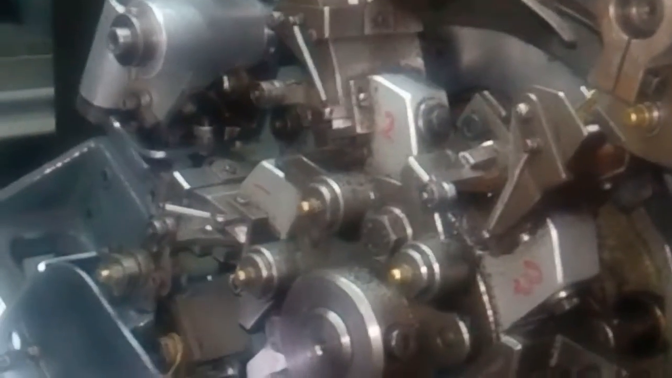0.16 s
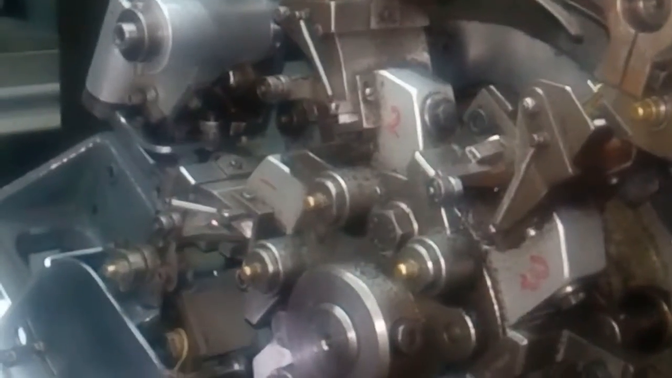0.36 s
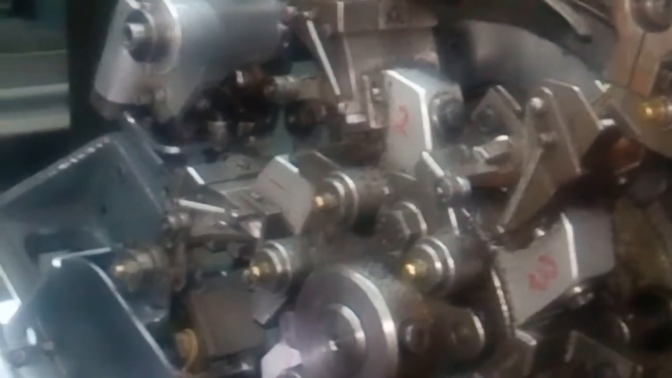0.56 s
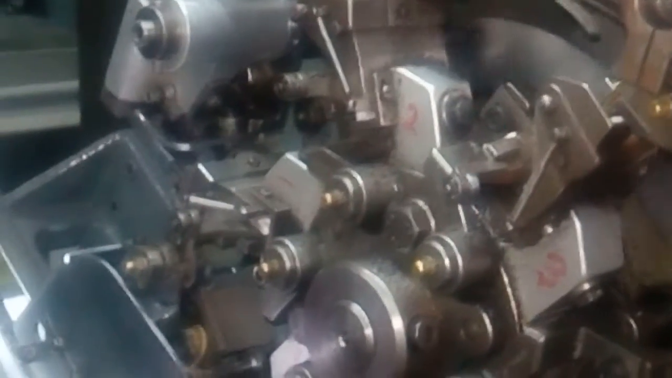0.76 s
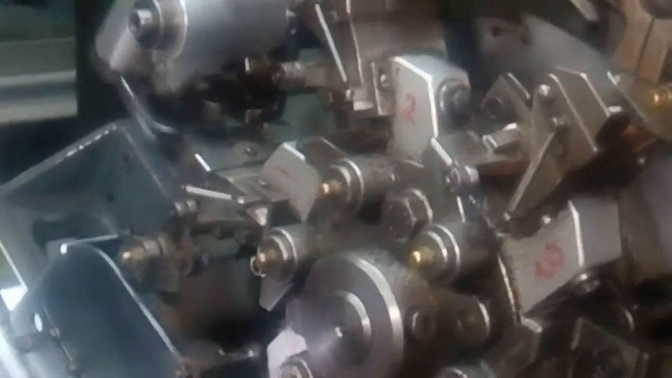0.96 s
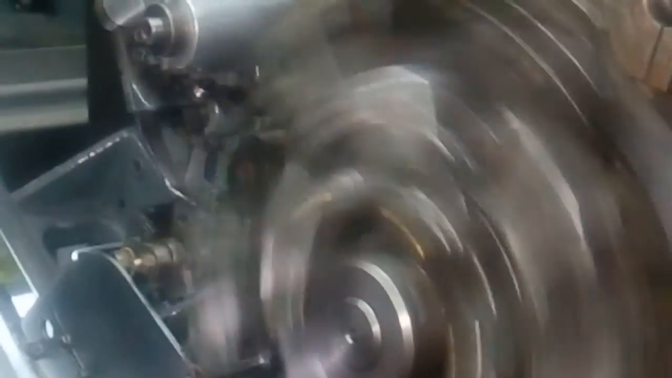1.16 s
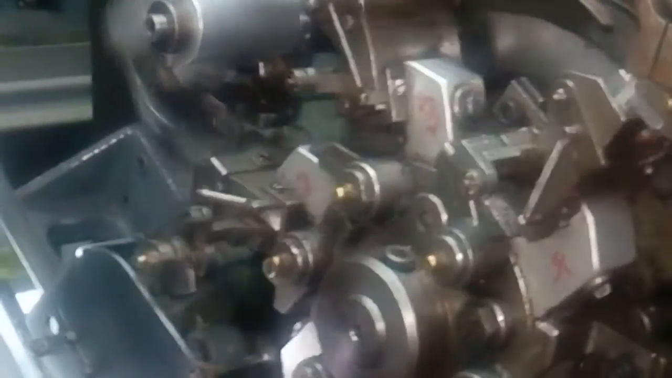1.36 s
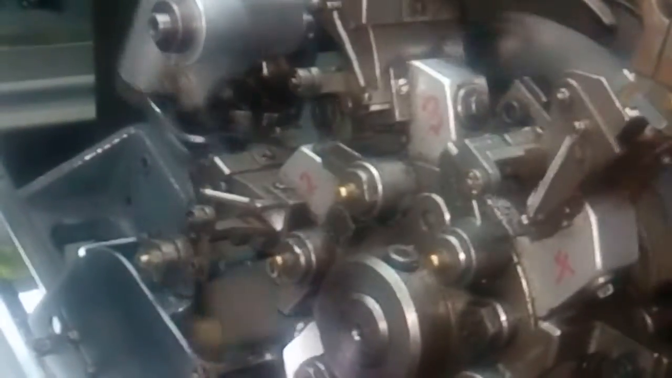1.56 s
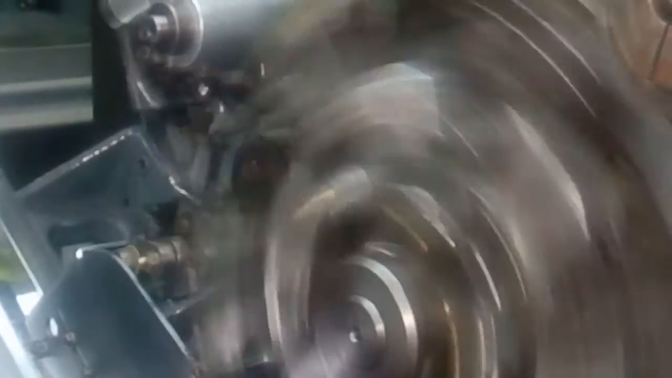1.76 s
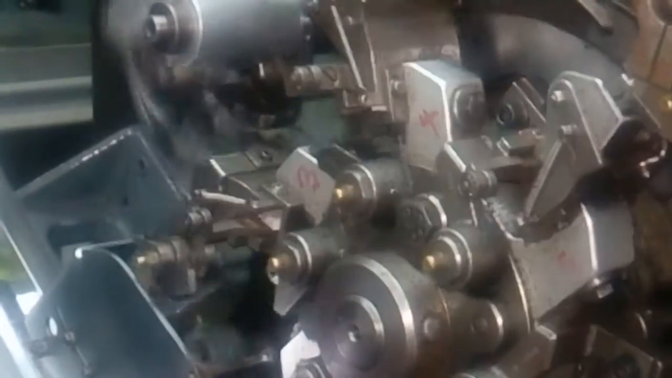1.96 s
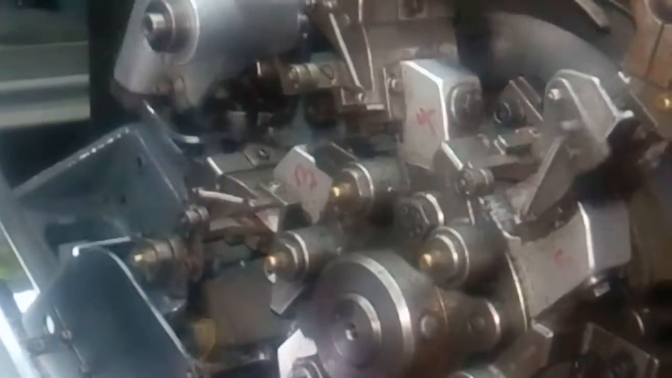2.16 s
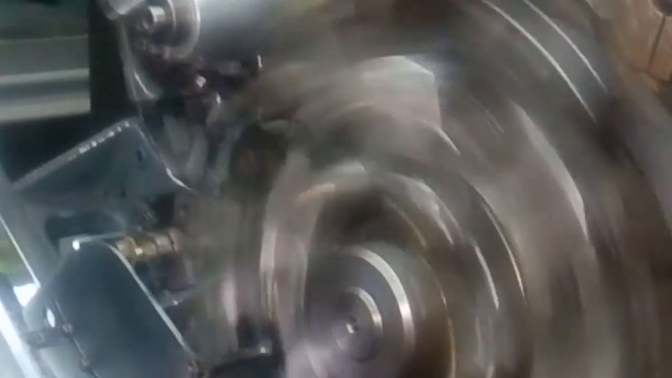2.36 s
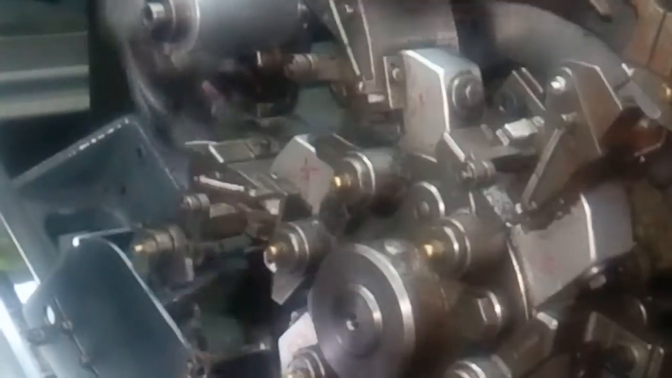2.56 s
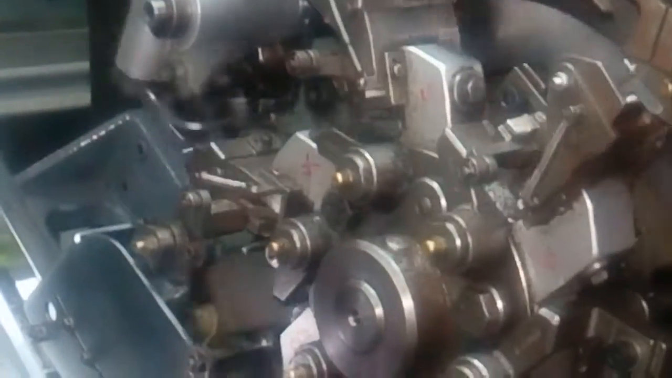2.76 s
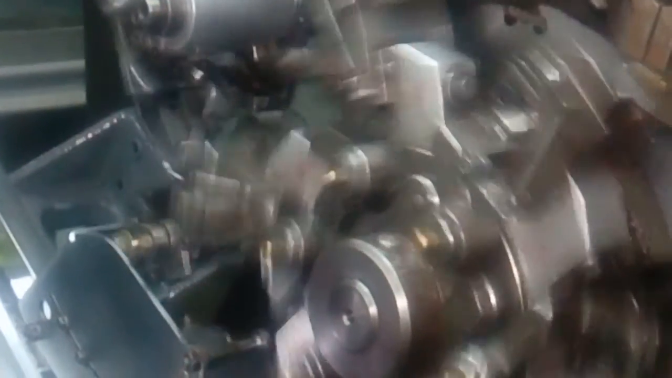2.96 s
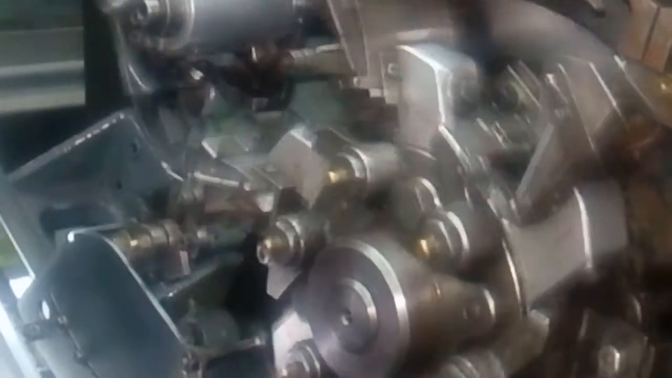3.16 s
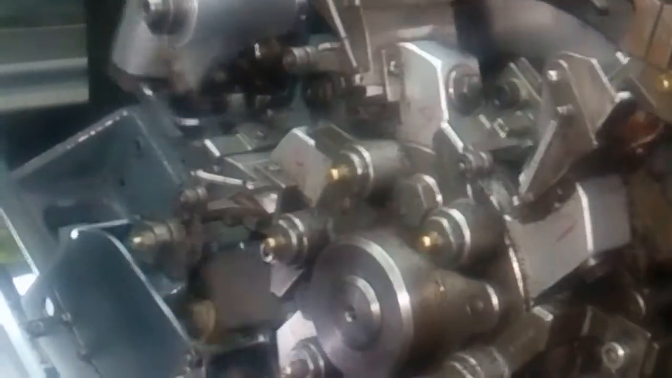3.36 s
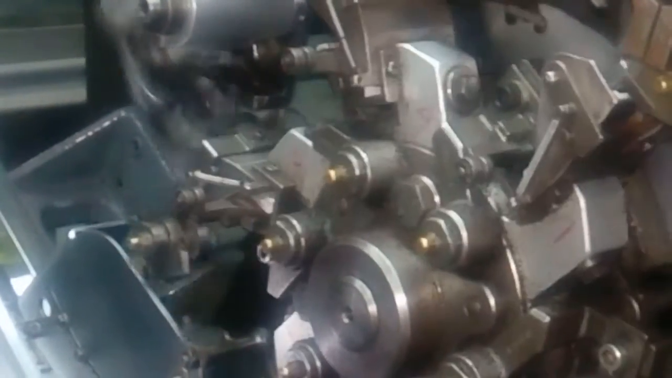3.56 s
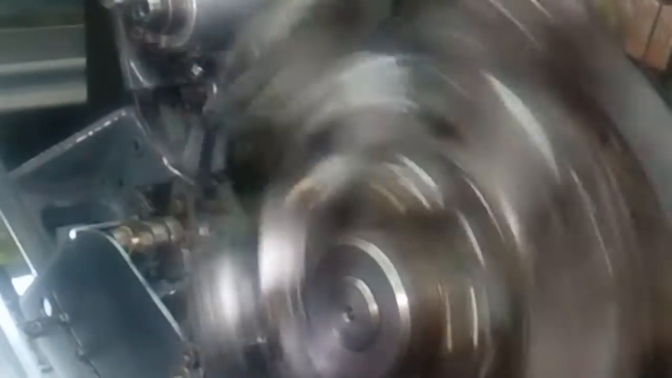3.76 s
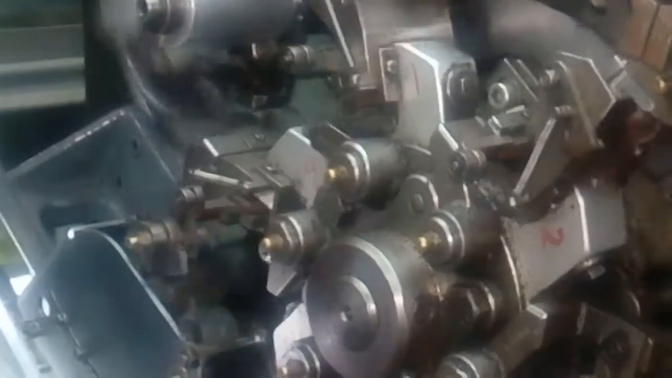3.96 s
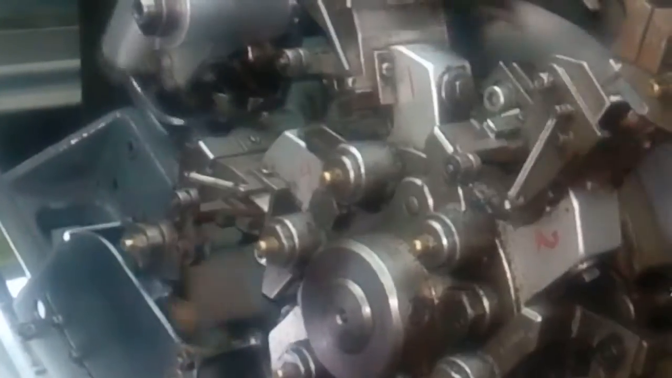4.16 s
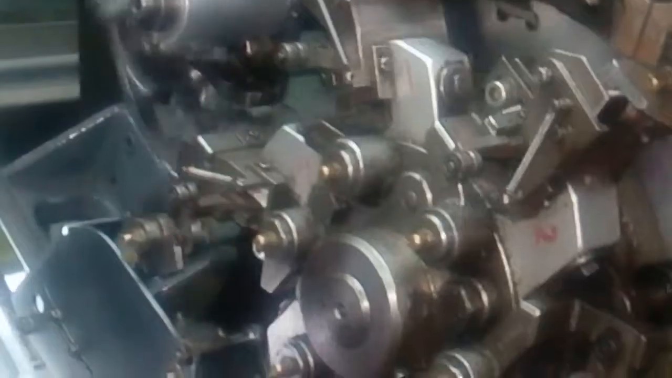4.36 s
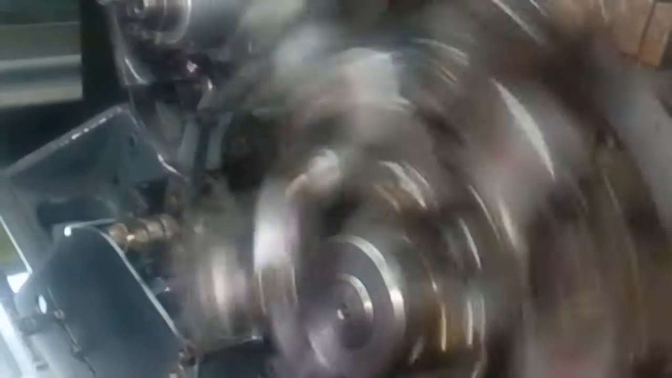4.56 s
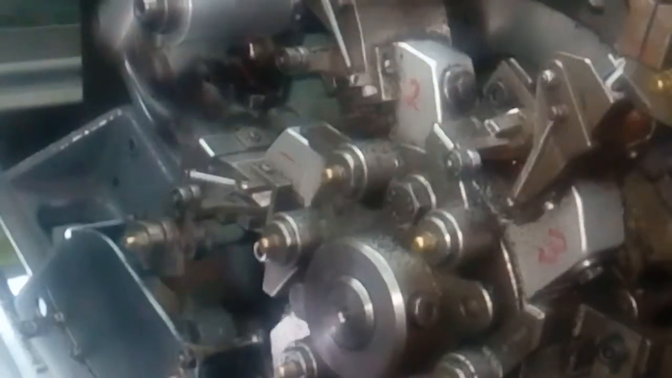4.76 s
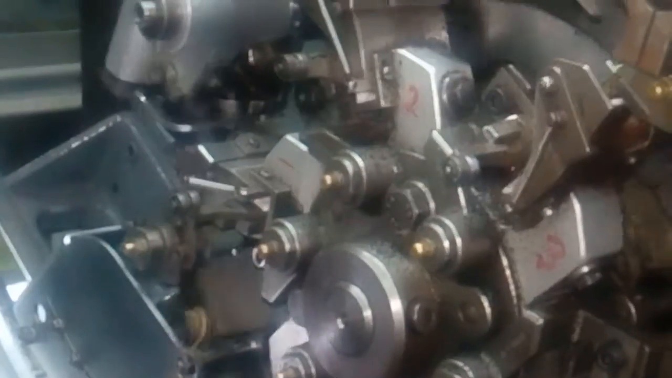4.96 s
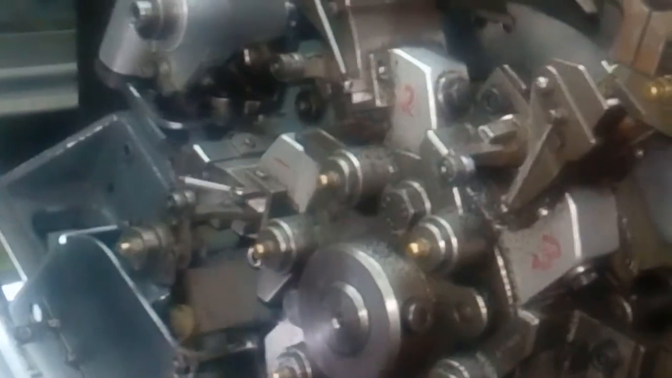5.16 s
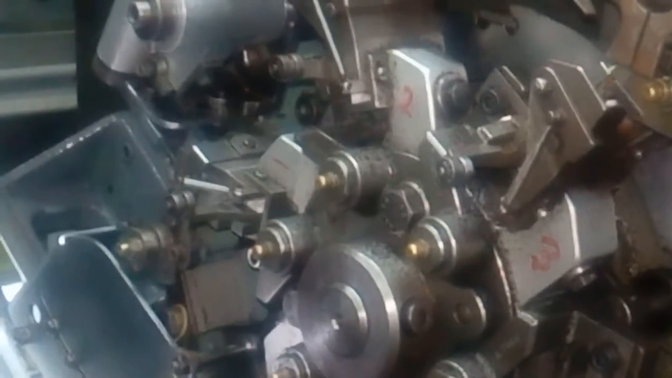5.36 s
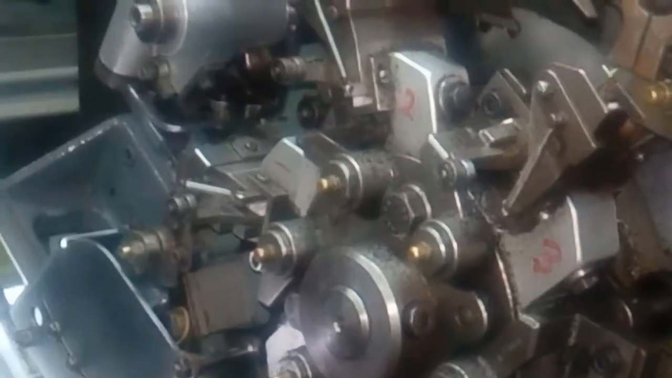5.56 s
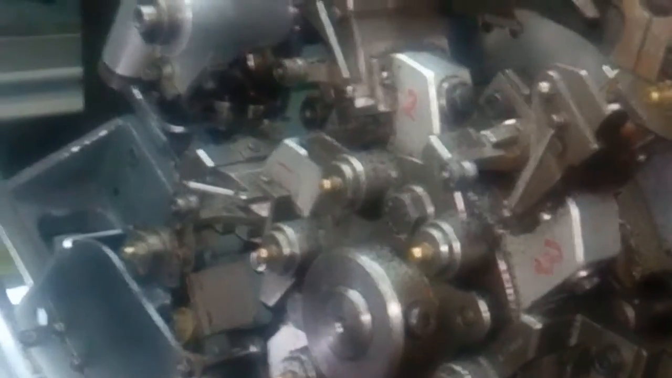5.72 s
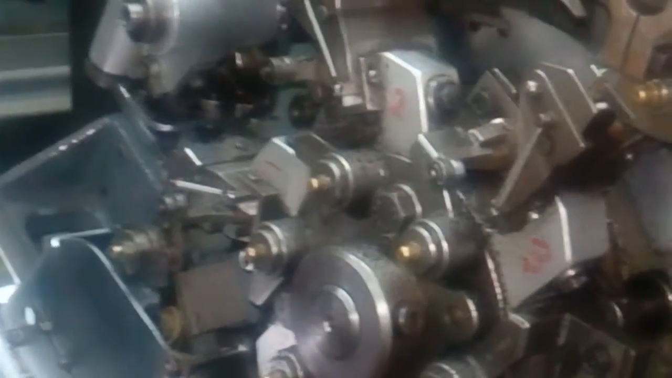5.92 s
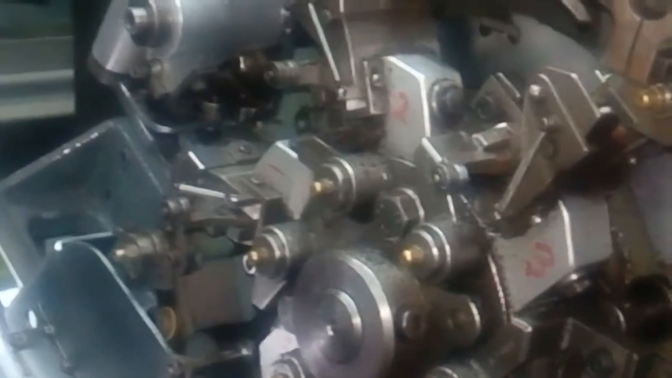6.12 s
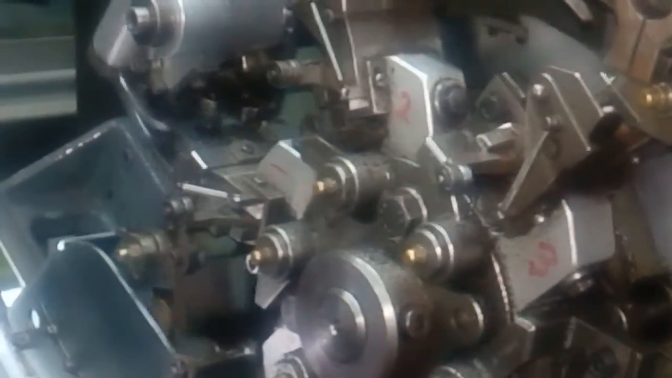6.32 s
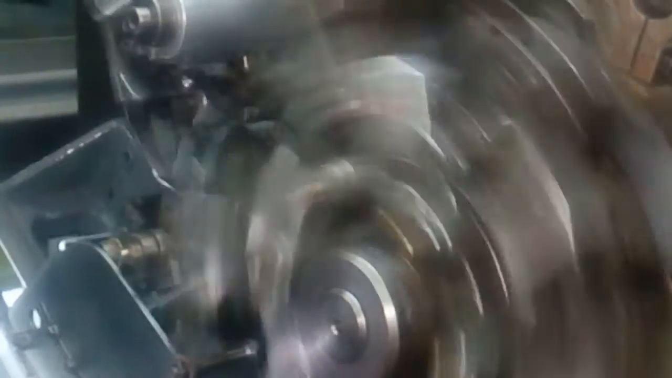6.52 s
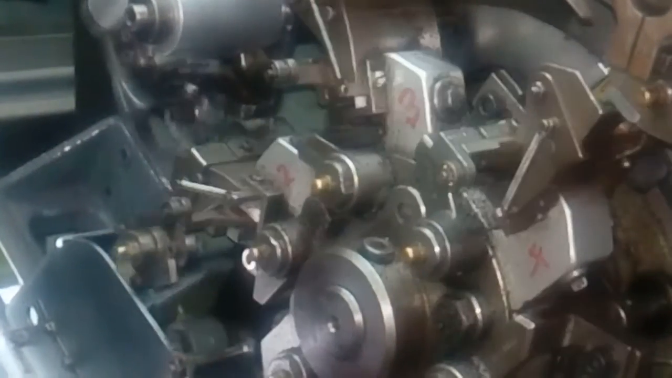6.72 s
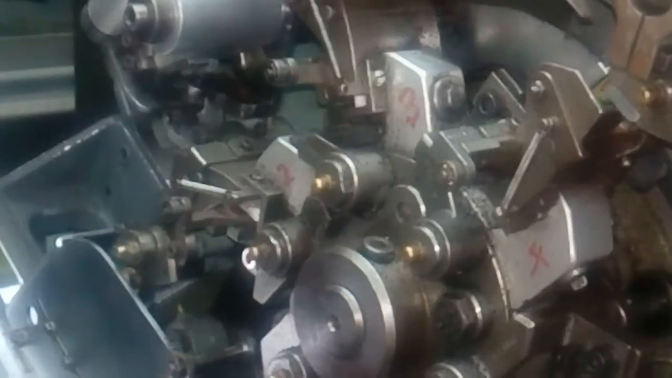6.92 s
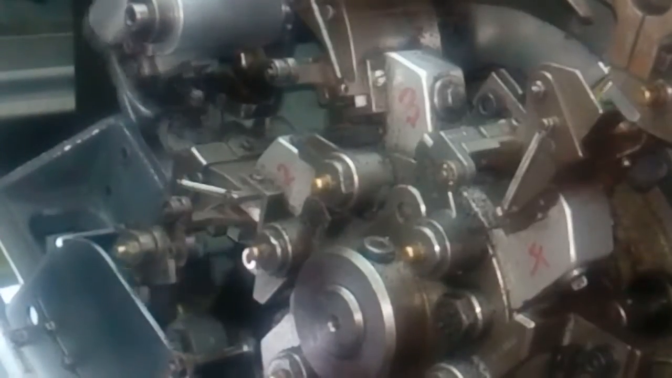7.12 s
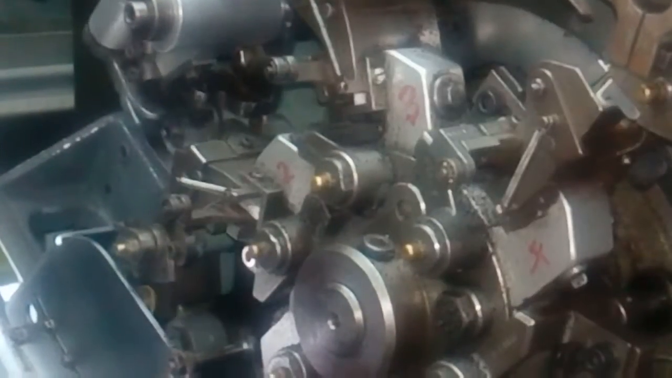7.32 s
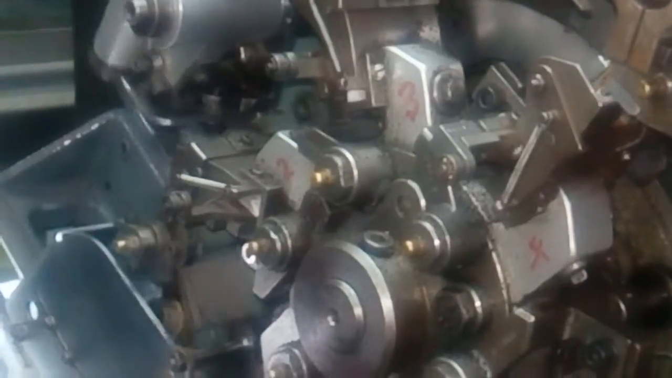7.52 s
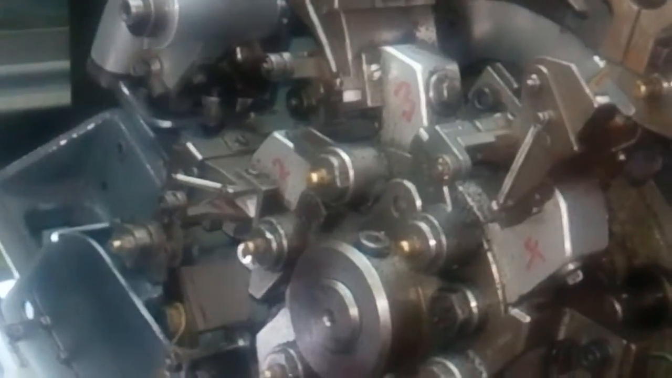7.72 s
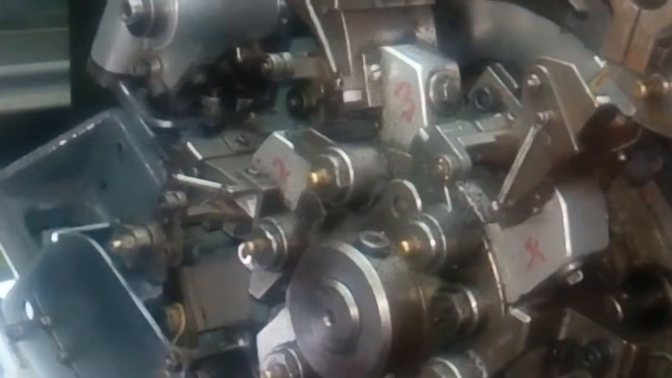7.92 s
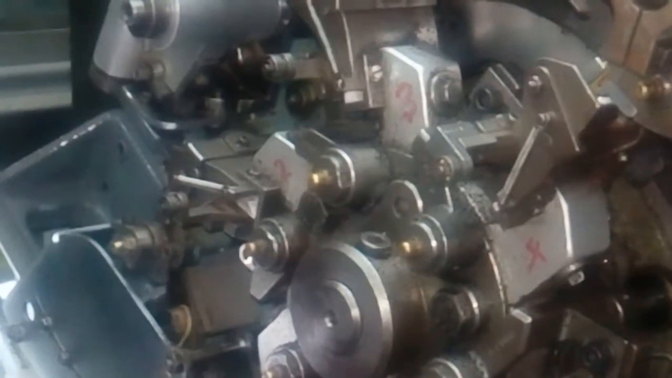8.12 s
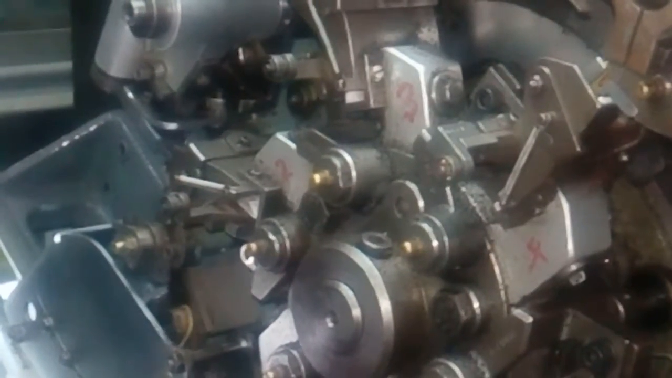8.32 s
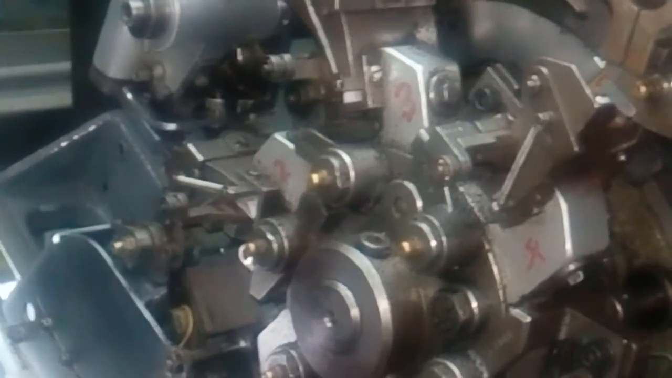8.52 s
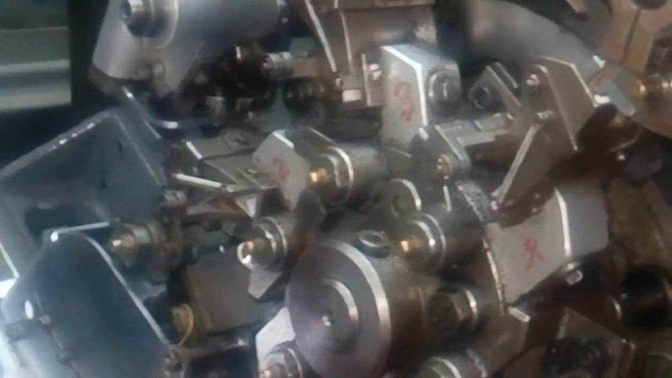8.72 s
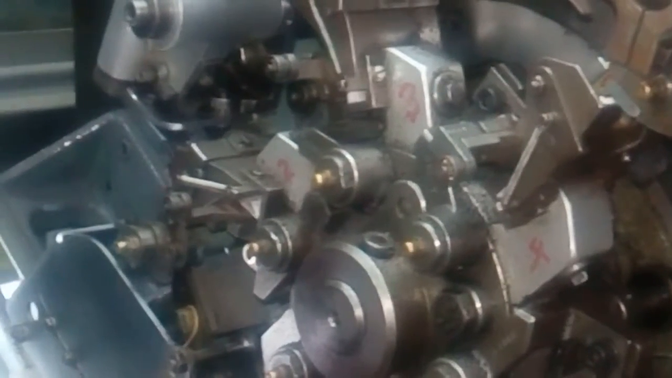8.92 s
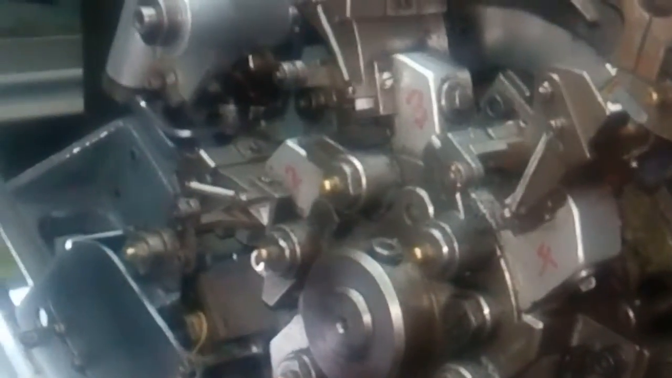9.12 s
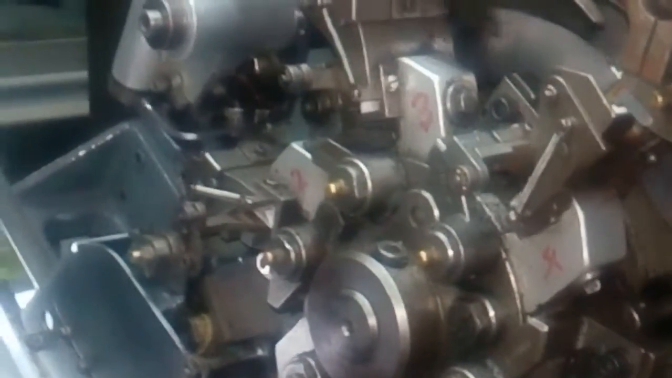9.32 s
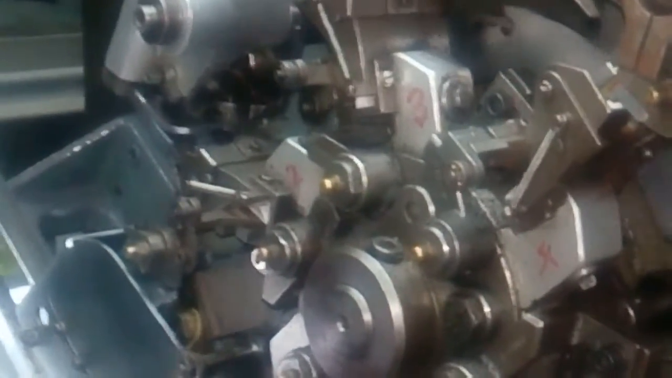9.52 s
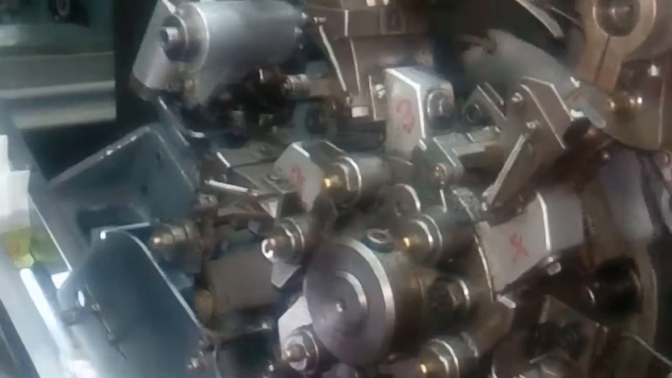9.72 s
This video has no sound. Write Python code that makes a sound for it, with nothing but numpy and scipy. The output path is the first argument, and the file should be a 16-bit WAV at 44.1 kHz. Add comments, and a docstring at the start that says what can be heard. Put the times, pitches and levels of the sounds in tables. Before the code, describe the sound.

A packing machine's steel levers clack singly, burst into dense clattering and rattling, then stop and start in short jerks over steady motor hum.

```python
"""Wrapping machine jogged round by hand control

Close by, a machine makes a run of about four seconds, with single nudges of the drive before and after it.
Impact excitation: steel cams, pawls and levers strike and chatter as noise bursts with decaying modes.
Random contacts make the loose joints rattle and the cast frame rumble while the shaft turns.
Wavering sines give the steady motor hum, filtered noise the hissing hall; the right port is much quieter."""
import sys
import numpy as np
from scipy import signal
from scipy.fft import rfft, irfft, next_fast_len
from scipy.io import wavfile
from scipy.ndimage import uniform_filter1d

SR = 44100
rng = np.random.default_rng(int(sys.argv[2]) if len(sys.argv) > 2 else 0)


def persist_wave(psi):
    """Save psi, clipped to +-1, as 16-bit WAV."""
    counts = np.round(np.clip(psi, -1, 1) * 32767).astype(np.int16)
    wavfile.write(sys.argv[1], SR, np.atleast_2d(counts).T)


N = 431298
TIME = np.arange(N) / SR  # s

# All table levels are relative: later gains and filters shift them.


def undb(db):
    """Level definition: decibels to amplitude gain."""
    return 10 ** (np.asarray(db) / 20)


def unit(x):
    """Normalisation: scale to rms 1."""
    return x / np.sqrt(np.mean(x ** 2))


def convolve(x, response):
    """Linear superposition: pass a sound through an impulse response."""
    return signal.fftconvolve(np.atleast_2d(x), np.atleast_2d(response), axes=-1)[:, :N]


def colour(x, points):
    """Minimum-phase filtering: a causal filter with the given (f/Hz, level/dB) spectrum."""
    hz, db = np.transpose(points)
    size = 2 ** 13
    log_hz = np.log(np.fft.rfftfreq(size, 1 / SR) + 1)
    log_gain = np.log(undb(np.interp(log_hz, np.log(hz), db)))
    # folding the cepstrum onto positive times makes the response causal
    cepstrum = irfft(log_gain)[:size // 2]
    cepstrum[1:] *= 2
    response = irfft(np.exp(rfft(cepstrum, size)))[:size // 2]
    return convolve(x, response)


def resonance(x, hz, q):
    """Resonance: one broad peak, gain 1 at its centre."""
    b, a = signal.iirpeak(min(hz, SR / 3), max(q, 1), fs=SR)
    return signal.lfilter(b, a, x)


def fade(t60):
    """Exponential damping: one second of decay, by 60 dB in t60 seconds."""
    return np.exp(-np.log(1000) * TIME[:SR] / t60)


def mode_sum(modes):
    """Modal superposition: damped (f/Hz, level/dB, t60/s) modes, with separate phases at each port."""
    out = 0
    for hz, db, t60 in modes:
        cycles = hz * TIME[:SR] + rng.random((2, 1))
        out = out + undb(db) * fade(t60) * np.sin(2 * np.pi * cycles)
    return out


def ring(modes):
    """Modal response: an impulse response scaled to unit energy."""
    return unit(mode_sum(modes)) / np.sqrt(SR)


def scatter(t60):
    """Diffuse reverberation: dense reflections of unit energy, different at each port."""
    return unit(rng.standard_normal((2, SR)) * fade(t60)) / np.sqrt(SR)


def walk(rate):
    """Slow modulation: a smooth random wander of spread 1, with so many steps a second."""
    k = int(SR / rate)
    steps = np.repeat(rng.standard_normal(N // k + 1), k)
    return unit(uniform_filter1d(steps, k)[:N])


def decay_energy(energy, t60):
    """Exponential damping: each energy impulse dies away by 60 dB in t60 seconds."""
    return signal.lfilter([1], [1, -np.exp(-2 * np.log(1000) / (t60 * SR))], energy)


def taps(rate, spread_db, t60):
    """Shot noise: random contacts, so many a second, of uneven force, each a decaying burst of noise."""
    chance, force = rng.random(N), rng.standard_normal(N)
    energy = (chance < rate / SR) * undb(spread_db * np.clip(force, -2, 2)) ** 2
    return unit(np.sqrt(decay_energy(energy, t60)) * rng.standard_normal((2, N)))


def vary(x, spread_db, size=256):
    """Spectral modulation: contacts land on different spots of different parts, so the colour keeps changing."""
    bands = signal.stft(x, nperseg=size)[2]
    tint = rng.standard_normal(bands.shape[1:])
    tint = uniform_filter1d(tint, size=4, axis=0)
    tint = unit(uniform_filter1d(tint, size=2, axis=1))
    return signal.istft(bands * undb(spread_db * tint), nperseg=size)[1][:, :N]


def clink(hz, t, spread=0.27, t60=0.031, count=6):
    """Modal cluster: a small part's main mode and a few weaker ones around it, decaying together."""
    detune, phase = rng.standard_normal((count, 1)), rng.random((2, count, 1))
    size = rng.uniform(0.074, 0.77, (count, 1))
    detune[0], size[0] = 0, 1
    modes = size * np.sin(2 * np.pi * (hz * np.exp(spread * detune) * t + phase))
    return unit(modes.sum(axis=1)) * np.exp(-np.log(1000) * t / t60)


# noise spectrum of the factory hall: f/Hz, level/dB
HALL_SPECTRUM = [(20, -15), (36, -30), (50, -7), (80, 5), (115, -1.5), (300, -5), (520, -9), (850, -9.5),
                 (1200, -14.5), (2400, -15), (5500, -20), (7000, -34.5), (8500, -65), (15000, -77.5)]


def hall(level_db=-40.5):
    """Stationary noise: the roar and hiss of the factory, swelling slightly."""
    swell_db = .7 * walk(5.8)
    noise = unit(colour(rng.standard_normal((2, N)), HALL_SPECTRUM))
    return noise * undb(level_db + swell_db)


# echo spectrum of the hall, darker towards the top: f/Hz, level/dB
ECHO_SPECTRUM = [(500, -8.5), (5000, -12.5), (7500, -16), (9000, -17), (15000, -26.5)]


def hall_echo(machine):
    """Reverberation: the hall returns a diffuse, darker tail lasting about a second."""
    return colour(convolve(machine, scatter(t60=1.0)), ECHO_SPECTRUM)


def tones(lines, flutter_db, wander):
    """Modulated sines: (f/Hz, level/dB) tones that waver in strength (dB) and phase (rad)."""
    out = 0
    for hz, db in lines:
        strength = np.sqrt(2) * undb(db + flutter_db * walk(5))
        out = out + strength * np.sin(2 * np.pi * hz * TIME + wander * walk(2))
    return out


# two motors at slightly different speeds: f/Hz, level/dB
MOTOR_TONES = [(89.7, -47), (95.7, -50)]
# shaft and gear tones: f/Hz, level/dB
SHAFT_TONES = [(48.5, -61), (75, -60), (134.7, -62), (150, -57.5), (232.5, -59), (360.7, -57),
               (449.5, -58.5), (542.3, -56), (2245, -70)]


def motor():
    """Beating: two motors throb against each other under the tones of shafts and gears."""
    return tones(MOTOR_TONES, flutter_db=1.2, wander=.5) + tones(SHAFT_TONES, flutter_db=2.0, wander=.8)


# the mechanism gets going quickly, then coasts; the joints settle sooner than the frame
FRAME_RISE_S, JOINTS_RISE_S = 0.021, 0.042
FRAME_FALL_DB_PER_S, JOINTS_FALL_DB_PER_S = 62, 164


def driven(start, stop):
    """Transient envelope: gains of frame and joints for one push of the drive: spin up, hold, coast."""
    rise = np.clip(np.outer([1 / FRAME_RISE_S, 1 / JOINTS_RISE_S], TIME - start), 0, 1)
    fall_db = np.outer([FRAME_FALL_DB_PER_S, JOINTS_FALL_DB_PER_S], np.maximum(TIME - stop, 0))
    return rise * undb(-fall_db)


# the long run: the drive engages and lets go
RUN_START_S, RUN_STOP_S = 1.1, 5.087
# turns of the shaft, each begun by the drop of the indexing pawl:
# t/s, pawl level/dB, frame load level/dB, joint rattle level/dB
TURNS = [(1.176, -35.5, -30.5, -35), (1.768, -33, -32, -38), (2.381, -32.5, -30, -38),
         (3.002, -40, -32.5, -40), (3.674, -41.5, -32.5, -40), (4.408, -55, -34.5, -44),
         (5.011, -67, -34.5, -48.5)]
# stages of every turn (indexing, levers falling back, cam lifting, follower running off the cam, dwell):
# centre/turn, half width/turn, extra load level/dB, extra rattle level/dB
PHASES = [(0.99, 0.1, 1.5, 12), (0.23, 0.06, 0, 3.5), (0.6, 0.25, 6.5, 6.5), (0.6, 0.1, -2, 6),
          (0.854, 0.029, -4, -0.5)]
# short nudges of the drive: t/s, length/s, frame load level/dB, joint rattle level/dB
NUDGES = [(-0.1, 0.22, -33.5, -49), (0.6646, 0.047, -37.5, -45), (0.8046, 0.017, -30, -37.5),
          (1.003, 0.026, -36.5, -44), (6.012, 0.049, -37.5, -45.5), (6.331, 0.027, -36.5, -48),
          (6.465, 0.24, -30, -35), (7.129, 0.082, -36, -48.5), (7.452, 0.13, -34, -44),
          (8.072, 0.049, -38, -46), (8.552, 0.1, -35.5, -46), (9.238, 0.047, -38.5, -50),
          (9.358, 0.02, -32, -38), (9.692, 0.1, -36.5, -51)]


def motion(engage=0.78):
    """Periodic modulation: load swells with shaft angle; rattle sets in abruptly as each stage engages."""
    drops, _, *levels = np.transpose(TURNS)
    angle = np.interp(TIME, drops, np.arange(len(drops)))  # in turns
    angle = angle + np.minimum(TIME - drops[0], 0) / (drops[1] - drops[0])  # before the first drop
    db = np.array([np.interp(TIME, drops, level) for level in levels])
    for centre, width, load_db, rattle_db in PHASES:
        away = ((angle - centre + .5) % 1 - .5) / width
        extra_db = np.array([np.full(N, load_db), rattle_db * (away > -engage)])
        db = db + np.exp(-away ** 2) * extra_db
    gains = undb(db) * driven(RUN_START_S, RUN_STOP_S)
    for s, length, *nudge_db in NUDGES:
        gains = np.maximum(gains, undb(nudge_db)[:, None] * driven(s, s + length))
    return gains


# rumble of the thumped frame: f/Hz, level/dB
RUMBLE_SPECTRUM = [(25, -60), (50, -41), (120, -3.5), (185, -4), (260, -0.5), (325, -0.5), (400, -6),
                   (500, 0.5), (610, -5.5), (830, -2.5), (1000, -10), (1300, -10), (1800, -13.5),
                   (3000, -18), (7000, -65.5)]
# resonances of the cast frame and its covers: f/Hz, level/dB, t60/s
FRAME_MODES = [(238, -1, .09), (315, 1, .08), (385, -6, .08), (462, 0, .07), (530, -5, .07), (683, -3, .08),
               (770, -2, .05)]


def frame(ring_db=-3):
    """Forced vibration: cam followers thump the frame, which answers with its low resonances."""
    thumps = unit(colour(taps(rate=200, spread_db=1.0, t60=0.09), RUMBLE_SPECTRUM))
    ringing = unit(convolve(taps(rate=200, spread_db=0.0, t60=0.04), ring(FRAME_MODES)))
    return unit(thumps + undb(ring_db) * ringing)


# groans as a cam lifts its load, and a low swell of the hum at 7.24 s: t/s (middle), length/s, f/Hz, level/dB
GROANS = [(1.5, 0.3, 206, -30.5), (2.166, 0.25, 204, -29.5), (2.733, 0.23, 204, -35),
          (3.37, 0.26, 202, -33), (6.718, 0.42, 305, -43), (7.24, 0.39, 76, -41.5)]


def cams(waver=0.0328, rough_db=4.5):
    """Forced vibration: a loaded follower judders on its cam at a nearly steady pitch, swelling and fading."""
    out, drift, judder = np.zeros(N), 1 + waver * walk(33), undb(rough_db * walk(45))
    for s, length, hz, db in GROANS:
        swell = np.cos(np.pi * np.clip((TIME - s) / length, -.5, .5))
        out += np.sqrt(2) * undb(db) * swell * np.sin(2 * np.pi * hz * np.cumsum(drift) / SR)
    return out * judder


def pins(rate, centre_hz, spread, t60):
    """Random impacts: loose pins and rollers clink one by one, each at its own pitch."""
    t = TIME[:2 ** 11]
    out = np.zeros((2, N + len(t)))
    for place, pitch, force in rng.random((int(rate * N / SR), 3)):
        at = int(place * N)
        hz = centre_hz * np.exp(2 * spread * (2 * pitch - 1))
        out[:, at:at + len(t)] += (.25 + force ** 2) * clink(hz, t, spread=.2, t60=t60)
    return unit(out[:, :N])


# spectrum of the rattling joints: f/Hz, level/dB
RATTLE_SPECTRUM = [(80, -16), (600, 2.5), (1200, -5), (2400, 0), (3500, 2.5), (4100, 6.5), (5200, 4),
                   (6400, 1), (7300, -9), (7620, -9.5), (8050, -14), (11400, -15.5), (15500, -16.5)]


def joints():
    """Shot noise with impacts: loose pins clink over a dense ticking of the rollers."""
    ticks = vary(taps(rate=520, spread_db=3.3, t60=.016), spread_db=3.4)
    clinks = .5 * pins(rate=200, centre_hz=4400, spread=.3, t60=.014)
    return unit(colour(unit(ticks) + clinks, RATTLE_SPECTRUM))


# thuds and hollow knocks as a cam drops its load onto the frame or a cover: t/s, level/dB, f/Hz
THUDS = [(1.219, -22, 864), (1.267, -18.5, 283), (1.272, -18, 858), (1.381, -16.5, 785), (1.548, -19, 307),
         (1.62, -19, 763), (1.722, -20.5, 266.6), (2.025, -22, 490), (2.045, -16.5, 780), (2.111, -25, 765),
         (2.228, -19, 327), (2.423, -19.5, 865), (2.49, -27, 775), (2.846, -16, 317), (3.111, -17.5, 847),
         (3.141, -22.5, 289), (3.208, -19, 585), (3.302, -16.5, 757), (3.514, -24, 512), (3.631, -29, 336),
         (3.811, -19.5, 320), (3.975, -26, 339), (4.086, -23, 350), (4.765, -21, 251), (6.049, -30.5, 248),
         (6.077, -24, 767), (6.34, -37, 292), (6.578, -18.5, 790), (6.661, -21, 368), (6.813, -27, 800),
         (7.139, -29, 540), (7.149, -27.5, 304), (7.212, -26, 743), (7.466, -25.5, 826),
         (7.487, -20.5, 370), (7.496, -27, 139), (7.542, -25, 265), (8.091, -31.5, 284), (8.12, -36, 690),
         (8.563, -34, 640), (8.582, -40, 322), (8.626, -29, 293), (9.247, -37, 550), (9.372, -29, 342),
         (9.44, -33, 306), (9.716, -28, 307)]


def thuds(thud_db=-2, rise_cycles=2.16, ring_cycles=48):
    """Modal decay: a casting or cover swells for a few cycles and dies away, sooner at higher pitch."""
    out, t = np.zeros((2, N + SR)), TIME[:2 ** 13]
    for s, db, hz in THUDS:
        at = int(s * SR)
        swell = 1 - np.exp(-t * hz / rise_cycles)
        cluster = clink(hz, t, spread=0.36, t60=ring_cycles / hz)
        out[:, at:at + len(t)] += undb(db + thud_db) * swell * cluster
    return out[:, :N]


# ringing of the steel levers: f/Hz, level/dB, t60/s
STEEL_MODES = [(2532, -8, .25), (2940, -13, .13), (3230, -7, .04), (3520, 0, .035), (3613, 0, .05),
               (3839, -12, .2), (4585, -3, .09), (5038, -8, .2), (6262, -9, .16), (6433, -8, .14),
               (7590, 4, .05), (7710, 2, .04), (8808, -12, .08), (11400, 0, .012)]


def steel_ringing(contacts, level_db=-22.5):
    """Modal excitation: strikes and rattle set the steel levers ringing."""
    return undb(level_db) * convolve(contacts, ring(STEEL_MODES))


def pawl(snap_db=3, snap_t60=0.17):
    """Impulse excitation: the pawl's hard landing snaps brightly and leaves the steel's long modes ringing."""
    drops = np.zeros(N)
    for s, db, *_ in TURNS:
        drops[int(s * SR)] = undb(db)
    modes = mode_sum(STEEL_MODES)
    snap = rng.standard_normal((2, SR)) * fade(snap_t60)
    return convolve(drops, 2.8 * modes + undb(snap_db) * snap)


def soften(x, soft_db=-41):
    """Contact time: gentle contacts last longer than hard ones, so they lack the very top."""
    lowpass = signal.butter(6, 7900, fs=SR, output="sos")
    dull = signal.sosfiltfilt(lowpass, x)
    power = np.abs(uniform_filter1d(x[0] ** 2, SR // 200))  # averaged over 5 ms
    return dull + (x - dull) * power / (power + undb(soft_db) ** 2)


def chatter(t, span, rebound_db, count=4, crack_t60=0.021):
    """Repeated impact: a lever lands, hits its stop a few more times within milliseconds and rebounds once."""
    when = span * (np.arange(count) + rng.uniform(-.35, .35, count)) / count
    size = rng.uniform(.55, 1, count)
    when[0], size[0] = 0, 1
    energy = np.zeros(len(t))
    energy[(when * SR).astype(int)] = size ** 2
    energy[int(rng.uniform(.007, .018) * SR)] += undb(rebound_db) ** 2
    return np.sqrt(decay_energy(energy, crack_t60))


# hard lever and cam strikes: t/s, level/dB, f/Hz of the struck part, bracket knock level/dB
STRIKES = [(0.0228, -23.5, 3200, -46), (0.07, -20, 3200, -35), (0.1205, -27, 5550, -32),
           (0.1562, -14, 3030, -26), (0.7208, -27.5, 5320, -48), (0.8103, -16.5, 4510, -48),
           (0.8424, -25.5, 3500, -42), (0.9123, -30.5, 4740, -49), (1.0284, -33, 4740, -45),
           (1.115, -18, 4620, -42), (1.1773, -10.5, 3570, -37), (1.2603, -11, 3920, -19),
           (1.2948, -17, 4300, -24), (1.3377, -21, 2230, -18), (1.3815, -18, 5030, -31),
           (1.4087, -17, 5360, -22), (1.5179, -13, 5280, -23), (1.5554, -11, 4680, -29),
           (1.5821, -11.5, 3510, -19.5), (1.712, -18, 5380, -17), (1.7526, -11.5, 4330, -21),
           (1.768, -8, 3840, -35), (1.814, -15, 4100, -21.5), (1.8662, -22, 3500, -38),
           (1.8824, -25, 5530, -40), (2.0233, -22, 4600, -32), (2.1055, -18, 4060, -22),
           (2.1302, -13.5, 5070, -38), (2.163, -13.5, 4400, -23), (2.181, -12.5, 3670, -30),
           (2.204, -14.5, 3700, -31), (2.2244, -18, 4130, -30), (2.321, -16, 5300, -25),
           (2.3405, -11.5, 5000, -16), (2.3827, -4, 3680, -40), (2.403, -13.5, 3550, -43),
           (2.4224, -26, 2170, -20), (2.4667, -14, 3560, -25), (2.52, -25, 4280, -34),
           (2.5364, -20, 3130, -38), (2.626, -22, 4940, -23), (2.7362, -11, 4470, -38),
           (2.7667, -14, 6160, -29), (2.806, -12, 3530, -19), (2.94, -18.5, 5170, -26),
           (2.979, -12, 4300, -38), (3.051, -23.5, 5940, -33), (3.1082, -10, 3440, -24),
           (3.1388, -15.5, 3020, -19.5), (3.1998, -25, 4700, -23.5), (3.277, -19.5, 4440, -21),
           (3.3557, -16, 2060, -20), (3.3907, -15.5, 6450, -35), (3.423, -13, 4350, -33),
           (3.4406, -15, 3040, -34), (3.4665, -11.5, 3320, -36), (3.6112, -19, 5300, -21),
           (3.6755, -21, 3560, -44), (3.7174, -18.5, 3020, -45), (3.8031, -9, 3370, -23),
           (3.835, -17, 2030, -19), (3.913, -15, 3620, -23), (3.9814, -19.5, 4440, -21.5),
           (4.1007, -10.5, 4020, -23), (4.134, -13, 6130, -29), (4.153, -10, 3320, -45),
           (4.177, -19, 3500, -38), (4.34, -18, 4260, -21.5), (4.3737, -18, 3980, -27),
           (4.3819, -19, 3880, -40), (4.4298, -22, 3930, -38), (4.4613, -21, 3620, -32),
           (4.4817, -21, 4370, -33), (4.5783, -12, 3550, -33), (4.6176, -23, 3220, -37),
           (4.7835, -16.5, 3890, -20), (4.8925, -18, 4730, -21), (4.9412, -13.5, 4040, -42),
           (4.9596, -18, 4170, -34), (4.9871, -19.5, 4140, -44), (5.0101, -12, 2930, -47),
           (5.0624, -22.5, 4460, -44), (5.3615, -28.5, 2060, -43), (6.0707, -32, 2000, -29),
           (6.4696, -19.5, 4280, -51), (6.499, -17, 4620, -47), (6.5377, -13.5, 3600, -38),
           (6.512, -18, 4240, -43), (6.555, -13, 3730, -29), (6.5756, -16, 4200, -25),
           (6.586, -16, 3650, -21), (6.6403, -36, 4330, -31), (6.6578, -23, 3240, -34),
           (6.7984, -22, 2600, -46), (7.2126, -33, 4080, -27), (7.531, -28, 4180, -37),
           (7.6582, -23.5, 3890, -32), (8.1, -20, 4490, -33), (8.598, -33, 5730, -37),
           (8.6354, -12, 2790, -29), (9.362, -21, 4470, -37), (9.3705, -18, 4170, -27),
           (9.7438, -33, 4230, -32)]
# clack of the gears taking up their slack as a nudge begins: level/dB, f/Hz, knock level/dB
TAKE_UP = (-28, 1500, -27)


def blows():
    """Event superposition: the strikes, and the clack of each nudge that starts after time zero."""
    return list(STRIKES) + [(s, *TAKE_UP) for s, *_ in NUDGES if s > 0]


# spectrum of the cracks and clinks: f/Hz, level/dB
CLICK_SPECTRUM = [(500, -16), (1500, -2.5), (2300, 4.5), (2700, -0.5), (3500, 6.5), (4100, 5.5),
                  (5200, 5.5), (6500, 8), (7300, -2.5), (7620, -3.5), (8050, -10.5), (9800, -13.5),
                  (11400, -14.5), (13000, -16), (15500, -17)]
# spectrum of the duller bracket knocks: f/Hz, level/dB
KNOCK_SPECTRUM = [(25, -48), (60, -41), (180, 7), (300, 6.5), (750, 6.5), (1200, 8.5), (2200, 7.5),
                  (4000, 4.5), (9000, -53)]


def strikes(clink_db=-5, clink_t60=0.045, click_db=-24.0, chatter_s=0.0069, rebound_db=-9,
            knock_db=-5.5, knock_t60=0.12, rise_s=.0003, hard_db=-14):
    """Impact: each contact cracks, the part clinks, its bracket knocks; harder blows chatter longer."""
    clicks, knocks = np.zeros((2, 2, N + SR))
    t = TIME[:2 ** 12]
    for s, db, hz, bracket_db in blows():
        grain, thud = rng.standard_normal((2, 2, len(t)))
        span = chatter_s * np.clip(undb(.5 * (db - hard_db)), .5, 1.3)
        body = sum(resonance(grain, hz * np.exp(detune), 9) for detune in rng.normal(0, .36, 3))
        crack = chatter(t, span, rebound_db) * (grain + resonance(grain, hz, 3) + body)
        click = unit(crack) + undb(clink_db) * unit(clink(hz, t, t60=clink_t60))
        click = click * (1 - np.exp(-t / rise_s))
        at = max(int(s * SR), 0)
        clicks[:, at:at + len(t)] += undb(db + click_db) * click
        knocks[:, at:at + len(t)] += undb(bracket_db + knock_db) * thud * fade(knock_t60)[:len(t)]
    return colour(clicks[:, :N], CLICK_SPECTRUM), colour(knocks[:, :N], KNOCK_SPECTRUM)


def ports(x, alike_hz=750):
    """Spatial coherence: long waves reach both ports alike, short ones differently."""
    size = next_fast_len(N)
    alike = 1 / (1 + (np.fft.rfftfreq(size, 1 / SR) / alike_hz) ** 2)
    left, right = rfft(x, size)
    right = alike * left + np.sqrt(1 - alike ** 2) * right
    return irfft(np.array([left, right]), size)[:, :N]


def scene():
    """Superposition: the machine, its echo, the hall, the groaning cams and the motor add up."""
    load, rattle = motion()
    clicks, knocks = strikes()
    contacts = soften(clicks + rattle * joints())
    steel = contacts + steel_ringing(contacts) + pawl()
    machine = steel + knocks + thuds() + undb(-0.78) * load * frame()
    echo = hall_echo(machine)
    return ports(machine + echo + hall(), alike_hz=710) + cams() + motor()


# shading of the right port: f/Hz, level/dB
SHADE = [(100, -10.5), (400, -12), (1300, -13), (2400, -16), (4400, -21), (8000, -22.5), (15000, -24)]


def record(dry):
    """Shading and saturation: the right port is shaded, high peaks are rounded and the top is cut off."""
    both = undb(4.0) * np.vstack([dry[0], colour(dry[1], SHADE)])
    lowpass = signal.ellip(8, .2, 70, 15700, fs=SR, output="sos")  # edge at 15700 Hz
    return signal.sosfilt(lowpass, np.tanh(both))


dry = scene()
out = record(dry)
persist_wave(out)
```